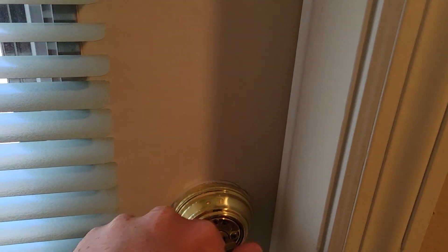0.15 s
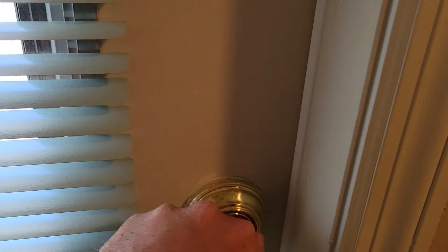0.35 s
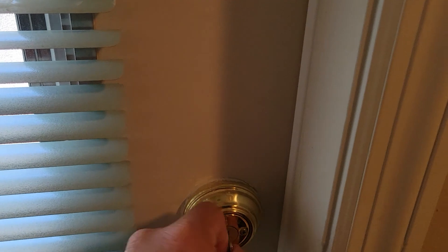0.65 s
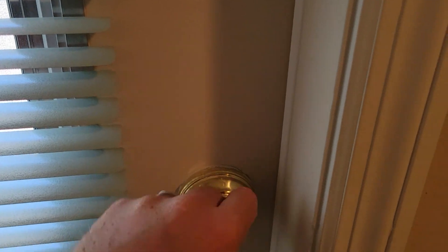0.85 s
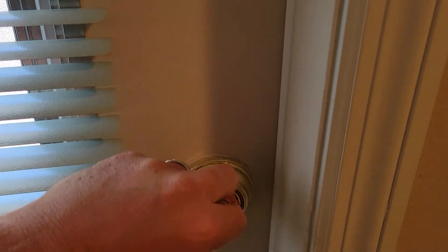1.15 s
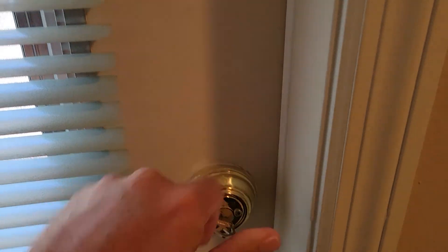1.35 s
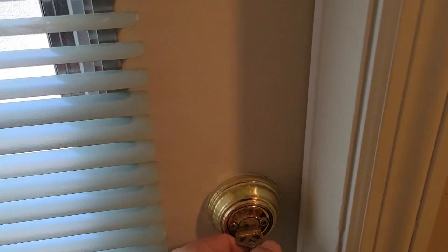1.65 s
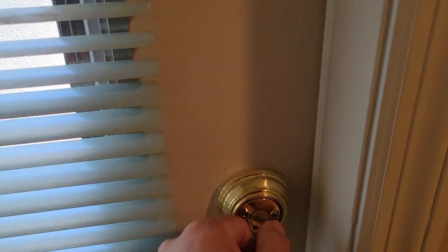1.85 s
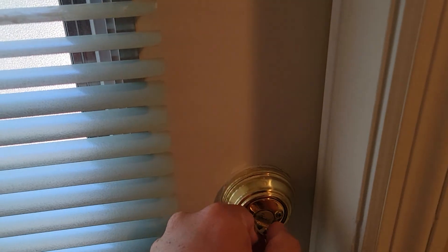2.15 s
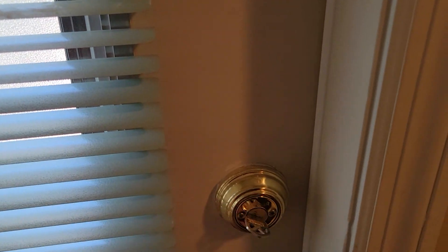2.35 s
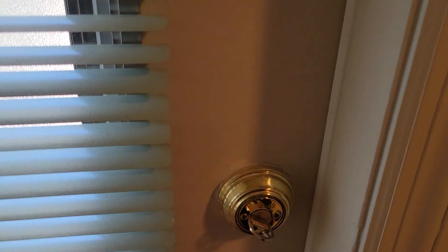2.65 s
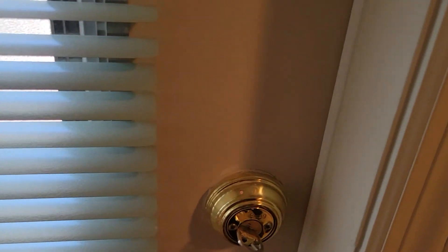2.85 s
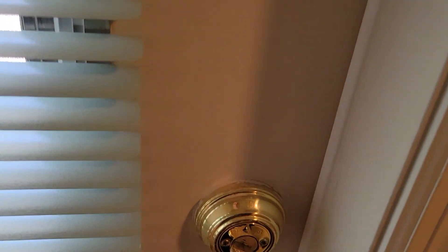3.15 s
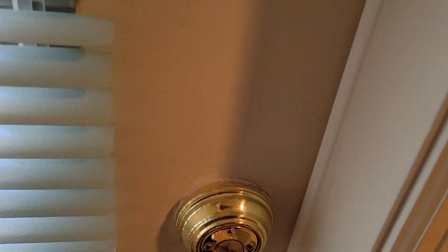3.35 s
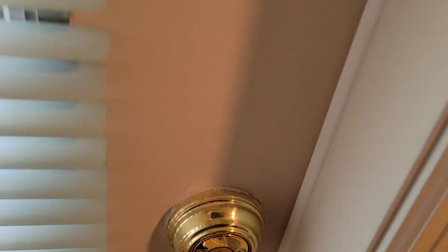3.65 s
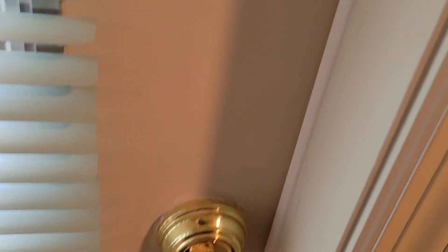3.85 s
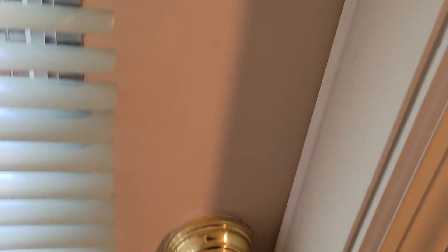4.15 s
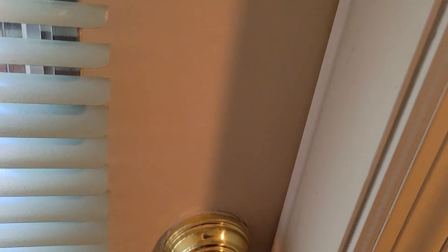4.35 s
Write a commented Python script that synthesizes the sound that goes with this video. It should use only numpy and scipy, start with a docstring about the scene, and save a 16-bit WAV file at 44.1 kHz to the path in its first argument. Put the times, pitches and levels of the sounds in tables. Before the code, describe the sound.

Small lock clicks and dull knob knocks over faint hum, door bumping and scuffing its seal, then one loud rattling slam.

```python
"""A faint appliance hum and still room air are heard first, under a hand's steady rub on a brass doorknob.
Lock clicks and knob knocks follow, each a grazing and chattering force that excites damped resonators.
The stiff door is then pushed: it rubs on its seal (modulated noise) and bumps in the frame (bending modes).
The latch snaps and the door shuts with a rattling bang, after which the brass rings in decaying sines.
A diffuse, exponentially decaying room response surrounds the contacts, the bumps and the ringing."""
import sys
import numpy as np
from scipy import signal
from scipy.fft import rfft, irfft, next_fast_len
from scipy.io import wavfile

SR = 44100
rng = np.random.default_rng(int(sys.argv[2]) if len(sys.argv) > 2 else 0)


def unload_wav(signal):
    """Save mono or channel-first audio to the path in sys.argv[1] as 16-bit WAV at rate SR, clipped to [-1, 1]."""
    wavfile.write(
        sys.argv[1],
        SR,
        np.round(np.clip(np.atleast_2d(signal).T, -1, 1) * 32767).astype(np.int16),
    )


N = 198062
TIME = np.arange(N) / SR  # seconds

# Spectrum of the still air. Each row: frequency in Hz, relative level in dB.
AIR_SPECTRUM = [(15, -16), (28, -4), (52, -3.5), (85, -12), (125, -5), (170, -21.5), (280, -16),
                (540, -21.5), (900, -26.5), (3200, -30.5), (7000, -40.5), (9000, -45.5), (14500, -43),
                (16500, -41)]
# Tones of the appliance. Each row: frequency in Hz, rms level in dB.
HUM_TONES = [(54, -62.5), (120, -61)]
# Coherence of diffuse sound. Each row: frequency in Hz, left-right correlation from -1 to 1.
STEREO_CORRELATION = [(60, 0.53), (150, 0.98), (300, 0.65), (640, -0.39), (1400, -0.37), (3000, -0.078),
                      (15000, -0.099)]
# Reverberation. Each row: frequency in Hz, time to fall by 60 dB in seconds.
REVERB_T60 = [(100, 0.57), (500, 0.39), (1500, 0.34), (4000, 0.28), (8000, 0.35), (15000, 0.21)]
# Close reflections off door face and casing. Each row: delay in seconds, left level in dB, right level in dB.
CLOSE_REFLECTIONS = [(.0013, -19.5, -14.5), (.0029, -38, -12), (.0052, -23, -15)]

# Spectrum of dull sliding friction. Each row: frequency in Hz, relative level in dB.
SLIDE_SPECTRUM = [(150, -8), (280, -2.5), (400, -7), (560, -0.5), (800, -9), (1600, -13), (2400, -24),
                  (5000, -33.5), (16000, -42)]
# Spectrum of the brushed seal. Each row: frequency in Hz, relative level in dB.
SEAL_SPECTRUM = [(300, -8), (1500, 8), (3500, 6.5), (6000, 1.5), (9000, -3), (14000, -4), (17000, -5)]
# Twists of the knob. Each row: time of the peak in seconds, level in dB.
KNOB_TWISTS = [(0.73, -55.5), (1.04, -54.5), (1.42, -62.5), (1.7, -57.5), (1.88, -56.5), (2.35, -68),
               (2.7, -60.5)]
# Pushes on the door. Each row: time of the peak in seconds, dull slide level in dB,
# seal brush level in dB, rise in dB per second, fall in dB per second.
DOOR_PUSHES = [(3.018, -47.5, -49.5, 330, 164), (3.28, -53.5, -68, 52, 41), (3.72, -58.5, -53, 217, 42),
               (3.8, -45.5, -50, 197, 66.5), (4.178, -51, -81, 141, 153), (4.378, -42.5, -59, 236, 172)]
# Singing of sliding brass. Each row: time of the peak in seconds, level in dB,
# rise and fall in dB per second.
BRASS_SCRAPES = [(1.41, -64, 130), (1.95, -71, 69), (4.04, -54.5, 102)]

# Bumps of the whole door. Each row: start in seconds, level in dB, tilt about 100 Hz in dB per octave.
DOOR_BUMPS = [(2.624, -40, -5), (2.826, -42, -3), (2.966, -35.5, -3), (3.031, -25.5, -7.5),
              (3.199, -43.5, 9.5), (3.272, -27.5, 2.5), (3.293, -43, 3.5), (3.765, -33.5, -0.5),
              (3.843, -15.5, -7), (3.853, -19, 1.5), (3.897, -21.5, 2)]
# Bending modes of the door. Each row: frequency in Hz, level in dB, time to fall by 60 dB in seconds.
BENDING_MODES = [(43.6, -21.5, 0.5), (65, -23, 0.12), (95.2, 0, 0.18), (107.3, -7.5, 0.47),
                 (131.3, -1, 0.19), (179.5, -8.5, 0.16), (218.3, -9, 0.36), (269.8, -7.5, 0.16),
                 (306, -17, 0.55), (380.3, -18.5, 0.22)]
# Pings of the lock's springs. Each row: start in seconds, frequency in Hz, level in dB,
# time to fall by 60 dB in seconds.
SPRING_PINGS = [(1.557, 3220, -53.5, 0.04), (1.7886, 1794, -31.5, 0.052)]
# Brass ringing on after the bang. Each row: frequency in Hz, level in dB relative to BANG_RING_DB,
# time to fall by 60 dB in seconds.
BRASS_MODES = [(740, -12, 0.1), (1360, 12.5, 0.11), (1390, -11, 0.24), (1690, 0, .33), (1685, -6.5, 0.6),
               (1783, -7, 0.5), (3140, -10.5, 0.4), (3480, -6, 0.25), (14771, -8.5, .3)]

# Resonances of the parts a contact shakes; the jamb replaces the panel while the latch is
# at the strike plate. Each row: frequency in Hz, bandwidth in Hz, nominal level in dB.
PANEL_MODES = [(249, 106, -4), (392, 22, -10.5), (454.7, 41, -1.5), (535.5, 34.7, 4), (626, 32.6, -4),
               (716, 24, -11.5), (825, 128, -8.5), (907, 108, -9)]
JAMB_MODES = [(302, 39, -2), (477, 44, -3.5), (515, 77, -3.5), (688, 74, -7.5), (807, 44, -0.5),
              (856, 87, -3.5), (933, 64, -3.5)]
LOCK_CASE_MODES = [(1163, 216, -1.5), (1275, 146, 0), (1435, 57, -2.5), (1626, 59, -1.5), (1745, 100, -2),
                   (1907, 367, -7), (2268, 160, -8.5)]
BRASS_SHELL_MODES = [(2510, 370, -2.5), (2756, 415, 0), (3340, 380, -1.5), (3720, 290, -1), (4340, 620, -4),
                     (5010, 730, -3), (6100, 1740, -5.5)]
EDGE_MODES = [(9340, 2700, 0.5), (11100, 1100, 1), (13440, 1470, 5.5), (15150, 470, 6)]
# The parts: wood, lock case, brass shell, edges. Each row: lowest frequency in Hz, highest frequency
# in Hz, factor on chatter time, strike weight per unit of hardness, tilt in dB per octave per unit
# of hardness, reverberation level in dB, left-right level difference in dB.
SHAKEN_PARTS = [(294, 930, 1.39, 7.5, 5.5, -4.5, -0.5), (960, 4600, 1.11, 8.1, 2, -12, -0.5),
                (1950, 16400, 1.21, 7.6, -2, -11.5, 2), (8850, 14000, 0.71, 11, 4.5, -7, -1)]
# Contacts: lock and latch clicks, the knob knocking in its play, small edges ticking, and the door
# hitting the frame with rattling hardware. Each row: time of the strike in seconds, force level in dB,
# brightness in dB per octave, chatter time in seconds before the part's factor, hardness (no unit).
LATCH_CLICKS = [(0.3162, -50, 3.5, .013, 2.4), (0.627, -53.5, -1.5, .014, 0.93),
                (0.6368, -40.5, 3.5, 0.0058, 1.7), (0.656, -46, -2.5, 0.0092, .5),
                (1.111, -61, -3, 0.0024, 1.6), (1.1415, -44.5, -4.5, 0.014, 1.04),
                (1.7888, -48.5, -3.5, 0.008, 1), (3.196, -46, -5.5, 0.017, .1),
                (3.2668, -45, 5.5, 0.0066, 0.44), (3.4559, -51, -3.5, 0.0076, 1.13),
                (3.781, -50, 9.5, 0.0092, 0.54), (3.8082, -24, 0, 0.012, 1.8),
                (4.314, -58.5, -4.5, 0.019, 0.2)]
KNOB_KNOCKS = [(0.9835, -51.5, -2.2, 0.019, 0.37), (1.366, -59, -1, 0.019, 0.89),
               (1.673, -49.5, 1, 0.0071, 2.3), (1.6889, -55, -0.5, 0.017, 1.4),
               (1.849, -53.5, -1, 0.0067, 0.65), (2.6058, -58, 0.2, .01, 0.21),
               (2.829, -62.5, 0, 0.011, 1.6), (2.9635, -52, 2, 0.032, 0.28),
               (3.021, -51, 1.5, 0.016, 0.057), (4.36, -45, -2, 0.018, 0.28), (4.4117, -65, 0, .014, .22)]
EDGE_TICKS = [(1.0744, -76, 3, 0.0024, .85), (1.744, -59.5, -0.5, .0033, .47), (3.7604, -62, 1, .006, 0.83),
              (4.2885, -73.5, 0, .0071, .94)]
FRAME_SLAM = [(3.843, -25, -1, 0.0095, .12), (3.8476, -21, 0, 0.012, 1.02), (3.858, -28.5, 2.5, 0.033, .76),
              (3.893, -34.5, 2.5, 0.025, 0.2)]
# Sharing of the force by kind of contact. Each holds: wood in dB, lock case in dB,
# brass shell in dB, edge in dB.
CLICK_FORCE_SHARE = (-3.5, 0.5, -3.5, -23)
KNOCK_FORCE_SHARE = (6.5, -1, -10.5, -15)
TICK_FORCE_SHARE = (9, 0.5, -1, 1.5)
SLAM_FORCE_SHARE = (-6, 0, -2, -4.5)
# Treble dips of the left and right microphone port. Each row: frequency in Hz, depth in dB, Q (no unit).
MICROPHONE_DIPS = [(8700, -1.5, 35), (8920, -11, 2.36)]

AIR_DB = -58.5
GRIP_DB, LET_GO_S, LET_GO_DB_PER_S = -62.5, 1.73, 70
TWIST_RISE_DB_PER_S, TWIST_FALL_DB_PER_S = 75, 86
SCRAPE_HZ, SCRAPE_WIDTH_HZ = 3146, 250
NUDGE_DB, NUDGE_TILT_DB_PER_OCTAVE = -11.5, 4.5
BANG_S, BANG_RING_DB = 3.848, -32.5
LEFT_LEAD_S = 0.00024  # sound reaches the left side first
LATCH_MEETS_S, DOOR_AT_REST_S = 3.7, 4.1
GRAZE_ROOM_S = 0.02  # time left for grazing before each strike
SHARPEST_RISE_S = 2e-4  # limit for the hardest contact
PIVOT_HZ = 1600  # brightness tilts the parts about this pitch
FIDGET_FROM_S, FIDGET_LOWEST_DB, FIDGET_SPREAD_DB = 0.38, -71, 6
FIDGET_BRIGHT_DB, FIDGET_CHATTER_S, FIDGET_HARDNESS = -1.5, 0.0068, 0.54


def from_db(db):
    """Logarithmic level: decibels to amplitude gain."""
    return 10 ** (np.asarray(db) / 20)


def rms_one(x):
    """Normalization of mean power: scale to rms 1."""
    return x / np.sqrt(np.mean(x ** 2) + 1e-20)


def at_hz(points, hz):
    """Logarithmic pitch scale: interpolate a table over log frequency."""
    table_hz, value = np.transpose(points)
    return np.interp(np.log(np.maximum(hz, 1)), np.log(table_hz), value)


def panned(db):
    """Interaural level difference: left and right gains whose ratio is db."""
    return from_db(np.array([[db], [-db]]) / 2)


def band(x, low_hz, high_hz, order=2):
    """Causal Butterworth band-pass filtering."""
    sos = signal.butter(order, [low_hz, high_hz], "band", fs=SR, output="sos")
    return signal.sosfilt(sos, x)


def pair(mid, side, correlation):
    """Partial coherence: two independent signals mix to a stereo pair of given correlation."""
    common = np.sqrt((1 + correlation) / 2) * mid
    opposed = np.sqrt((1 - correlation) / 2) * side
    return common + opposed * np.array([[1], [-1]])


def coloured_noise(spectrum):
    """Spectral shaping: diffuse stereo noise filtered in the frequency domain, rms 1."""
    size = next_fast_len(N, True)
    hz = np.fft.rfftfreq(size, 1 / SR)
    mid, side = rfft(rng.standard_normal((2, size)))
    stereo = pair(mid, side, at_hz(STEREO_CORRELATION, hz))
    return rms_one(irfft(stereo * from_db(at_hz(spectrum, hz)), size)[:, :N])


def grain(per_s, depth_db, size):
    """Random amplitude modulation: a gain wandering between random levels in dB, rms 1."""
    levels = np.clip(rng.standard_normal(size), -2, 2)
    position = np.arange(size) * per_s / SR
    return rms_one(from_db(depth_db * np.interp(position, np.arange(size), levels)))


def swell(s, db, rise_db_per_s, fall_db_per_s):
    """Exponential envelope: a gain that climbs to a peak and falls away, linear in dB."""
    below_peak = np.maximum((s - TIME) * rise_db_per_s, (TIME - s) * fall_db_per_s)
    return from_db(db - below_peak)


def add(track, s, sound):
    """Linear superposition: mix a stereo sound in at a time."""
    start = int(s * SR)
    track[:, start:start + sound.shape[1]] += sound[:, :N - start]


def background(waver_db=3.5):
    """Stationary noise and tones: still air of the house and the wavering hum of an appliance."""
    hum = 0
    for hz, db in HUM_TONES:
        tone = np.sqrt(2) * np.sin(2 * np.pi * (hz * TIME + rng.random()))
        hum = hum + from_db(db) * tone * grain(22, waver_db, N)
    return from_db(AIR_DB) * coloured_noise(AIR_SPECTRUM) + hum


def room_response(build_s=0.00334):
    """Diffuse reverberation: reflections build up quickly, then decay at a rate set by pitch."""
    t, out = TIME[:SR * 3 // 4], 0
    edges = np.geomspace(40, 18000, 11)
    for low, high in zip(edges, edges[1:]):
        hz = np.sqrt(low * high)
        decay = from_db(-60 * t / at_hz(REVERB_T60, hz))
        fade = decay * (1 - np.exp(-(t / build_s) ** 2))
        mid, side = band(rng.standard_normal((2, len(t))), low, high)
        noise = pair(mid, side, at_hz(STEREO_CORRELATION, hz))
        out = out + noise * fade / np.linalg.norm(fade)  # about unit gain
    return out


def in_room(x, response, wet_db):
    """Convolution with the room response: direct sound plus its reflections."""
    return x + from_db(wet_db) * signal.fftconvolve(x, response, axes=1)[:, :N]


def near_echoes(x):
    """Comb filtering: short delays from close surfaces interfere with the direct sound."""
    out = x.copy()
    for delay_s, left_db, right_db in CLOSE_REFLECTIONS:
        add(out, delay_s, x * from_db([[left_db], [right_db]]))
    return out


def rubbing(slide_rough_db=2.5, seal_rough_db=3.5):
    """Uneven friction: dull noise from grip, twists and pushes, bright where a push brushes the seal."""
    slides = [swell(LET_GO_S, GRIP_DB, 0, LET_GO_DB_PER_S)]  # steady until the hand lets go
    slides += [swell(s, db, TWIST_RISE_DB_PER_S, TWIST_FALL_DB_PER_S) for s, db in KNOB_TWISTS]
    slides += [swell(s, db, rise, fall) for s, db, _, rise, fall in DOOR_PUSHES]
    brushes = [swell(s, db, rise, fall) for s, _, db, rise, fall in DOOR_PUSHES]
    # independent frictions add in power
    slide = np.linalg.norm(slides, axis=0) * coloured_noise(SLIDE_SPECTRUM) * grain(70, slide_rough_db, N)
    seal = np.linalg.norm(brushes, axis=0) * coloured_noise(SEAL_SPECTRUM) * grain(220, seal_rough_db, N)
    return slide + seal


def scraping(rough_db=1.5):
    """Friction-excited resonance: sliding brass sings in a narrow band of noise."""
    low_hz, high_hz = SCRAPE_HZ - SCRAPE_WIDTH_HZ / 2, SCRAPE_HZ + SCRAPE_WIDTH_HZ / 2
    hiss = rms_one(band(rng.standard_normal((2, N)), low_hz, high_hz, order=1))
    envelope = sum(swell(s, db, rate, rate) for s, db, rate in BRASS_SCRAPES)
    return envelope * hiss * grain(83, rough_db, N)


def door(room, push_s=0.00081, pan_db=3.0, wet_db=-12):
    """Modal superposition: bumps, clicks and knocks set the slab's bending modes booming."""
    t, track = TIME[:SR * 3 // 4], np.zeros((2, N))
    hz, mode_db, t60 = np.transpose(BENDING_MODES)[:, :, None]
    soft_onset = 1 - np.exp(-t / push_s)
    rings = np.sin(2 * np.pi * hz * t) * from_db(-60 * t / t60) * soft_onset
    rings[1::2] *= -1  # alternating sign
    # clicks and knocks nudge the slab in proportion to what reaches the wood
    nudges = []
    for rows, share_db in [(LATCH_CLICKS, CLICK_FORCE_SHARE), (KNOB_KNOCKS, KNOCK_FORCE_SHARE)]:
        nudges += [(s, db + share_db[0] + NUDGE_DB, NUDGE_TILT_DB_PER_OCTAVE) for s, db, *_ in rows]
    for s, db, tilt_db in DOOR_BUMPS + nudges:
        strengths = from_db(db + mode_db + tilt_db * np.log2(hz / 100))
        add(track, s, panned(pan_db) * np.sum(strengths * rings, axis=0))
    return in_room(track, room, wet_db)


def ping(hz, db, t60):
    """Damped free vibration: one decaying sine, reaching the left side first."""
    t = np.maximum(TIME[:SR * 3 // 4] - np.array([[0], [LEFT_LEAD_S]]), 0)
    return from_db(db - 60 * t / t60) * np.sin(2 * np.pi * hz * t)


def ringing(room, wet_db=-12):
    """Free vibration of lightly damped metal: clear tones of the springs, and of brass after the bang."""
    track = np.zeros((2, N))
    for s, hz, db, t60 in SPRING_PINGS:
        add(track, s, ping(hz, db, t60))
    for hz, db, t60 in BRASS_MODES:
        add(track, BANG_S, ping(hz, BANG_RING_DB + db, t60))
    return in_room(track, room, wet_db)


def resonate(x, modes, low_hz, high_hz):
    """Forced resonance: parallel two-pole resonators of alternating sign, confined to the part's range."""
    out = 0
    for k, (hz, width, db) in enumerate(modes):
        radius = np.exp(-np.pi * width / SR)
        poles = [1, -2 * radius * np.cos(2 * np.pi * hz / SR), radius ** 2]
        zeros = np.array([1, 0, -1]) * (1 - radius ** 2) / 2  # about unit gain at the peak
        out = out + (-1) ** k * from_db(db) * signal.lfilter(zeros, poles, x)
    return band(out, low_hz, high_hz)


def contact(modes, low_hz, high_hz, chatter_s, strike, hardness,
            graze_s=0.0038, correlation=0.21, rough_db=0.5, scatter_db=1.0):
    """Contact mechanics: metal grazes, strikes and chatters away, driving a part's resonances."""
    hit = int(GRAZE_ROOM_S * SR)
    t = TIME[:SR // 3] - TIME[hit]
    force = pair(*rng.standard_normal((2, len(t))), correlation) * grain(900, rough_db, len(t))
    rise_s = graze_s * np.exp(-2 * hardness) + SHARPEST_RISE_S  # soft contacts creep in
    force *= np.exp(np.minimum(t / rise_s, -t / chatter_s))
    force[:, hit] += strike * hardness
    # each contact lands on another spot, so the mode levels scatter
    struck = [(hz, width, db + scatter_db * rng.standard_normal()) for hz, width, db in modes]
    left, right = resonate(force, struck, low_hz, high_hz)
    late_right = np.pad(right, (round(LEFT_LEAD_S * SR), 0))[:len(t)]
    sound = np.array([left, late_right])
    return sound / np.sqrt(np.mean(sound[:, hit:hit + SR // 50] ** 2))  # rms 1 over 20 ms from the strike


def fidgets(count=7):
    """Random excitation: rows for faint knocks that fingers stir while they hold the knob."""
    rows = []
    for when, size in rng.random((count, 2)):
        s = FIDGET_FROM_S + when * (LET_GO_S - FIDGET_FROM_S)
        db = FIDGET_LOWEST_DB + FIDGET_SPREAD_DB * size
        rows.append((s, db, FIDGET_BRIGHT_DB, FIDGET_CHATTER_S, FIDGET_HARDNESS))
    return rows


def hardware(room, usual_hardness=0.79):
    """Impact excitation: each contact shakes four parts, and a harder one tilts each part's mode levels."""
    out = 0
    kinds = [(LATCH_CLICKS, CLICK_FORCE_SHARE), (KNOB_KNOCKS + fidgets(), KNOCK_FORCE_SHARE),
             (EDGE_TICKS, TICK_FORCE_SHARE), (FRAME_SLAM, SLAM_FORCE_SHARE)]
    for k, (low_hz, high_hz, linger, strike, tilt_db, wet_db, pan_db) in enumerate(SHAKEN_PARTS):
        track = np.zeros((2, N))
        for rows, share_db in kinds:
            for s, force_db, bright_db, chatter_s, hardness in rows:
                wood = JAMB_MODES if LATCH_MEETS_S < s < DOOR_AT_REST_S else PANEL_MODES
                modes = [wood, LOCK_CASE_MODES, BRASS_SHELL_MODES, EDGE_MODES][k]
                octaves = np.mean([np.log2(hz / PIVOT_HZ) for hz, _, _ in modes])
                tilt = tilt_db * (hardness - usual_hardness)
                tilted = [(hz, width, db + tilt * np.log2(hz / low_hz)) for hz, width, db in modes]
                sound = contact(tilted, low_hz, high_hz, chatter_s * linger, strike, hardness)
                gain = from_db(force_db + share_db[k] + bright_db * octaves)
                add(track, s - GRAZE_ROOM_S, gain * sound)
        out = out + in_room(panned(pan_db) * track, room, wet_db)
    return near_echoes(out)


def scene():
    """Superposition of sources: air and hum, friction, door, ringing metal and hardware."""
    room = room_response()
    friction = rubbing() + scraping()
    return background() + friction + door(room) + ringing(room) + hardware(room)


def record(dry, low_cut_hz=36, top_cut_hz=16100):
    """Transducer response: a small microphone with no deep bass, a dip in each port, a steep top cut."""
    x = signal.sosfilt(signal.butter(2, low_cut_hz, "high", fs=SR, output="sos"), dry)
    dipped = []
    for side, (hz, db, q) in zip(x, MICROPHONE_DIPS):
        peak = signal.lfilter(*signal.iirpeak(hz, q, fs=SR), side)
        dipped.append(side + (from_db(db) - 1) * peak)
    top_cut = signal.ellip(10, 0.3, 80, top_cut_hz, fs=SR, output="sos")
    return signal.sosfilt(top_cut, np.array(dipped))


dry = scene()
out = record(dry)
unload_wav(out)
```